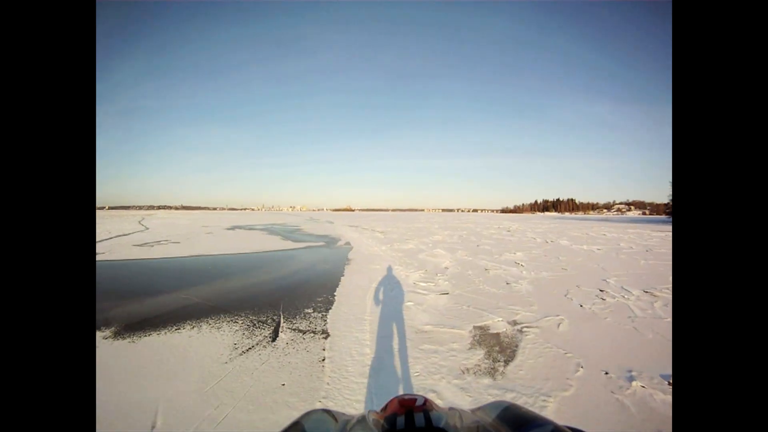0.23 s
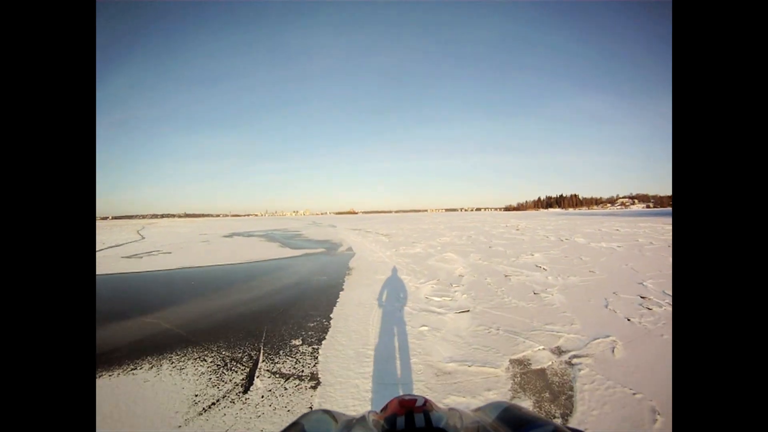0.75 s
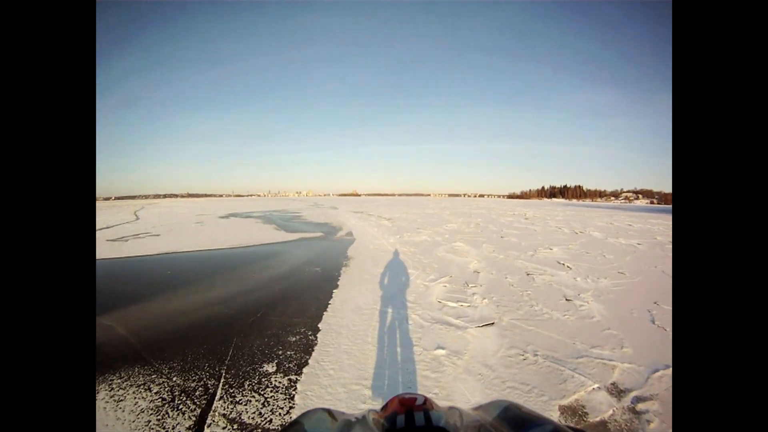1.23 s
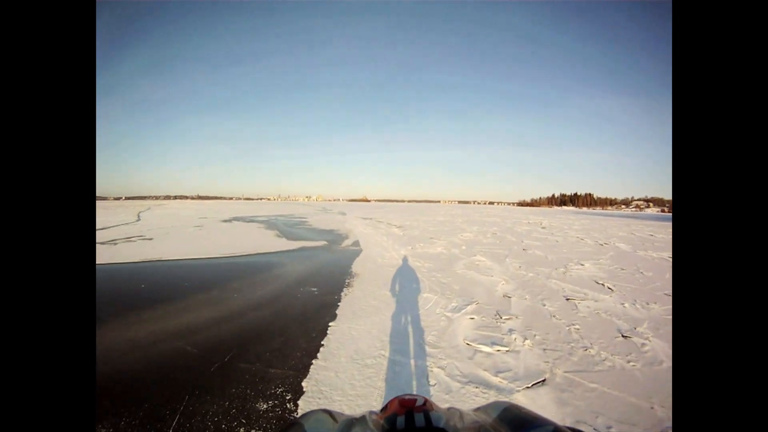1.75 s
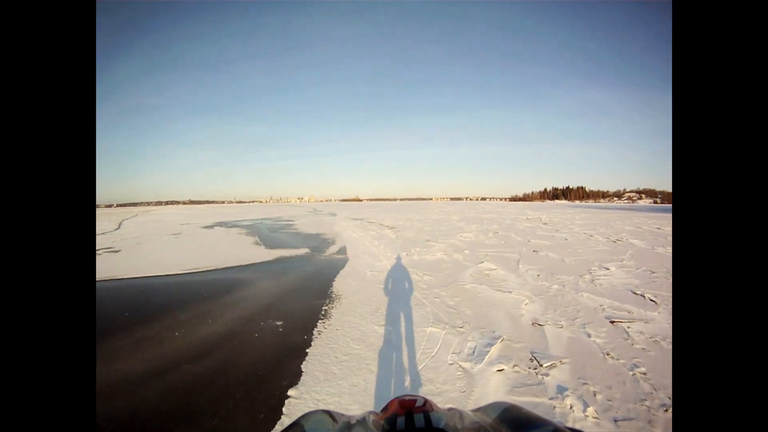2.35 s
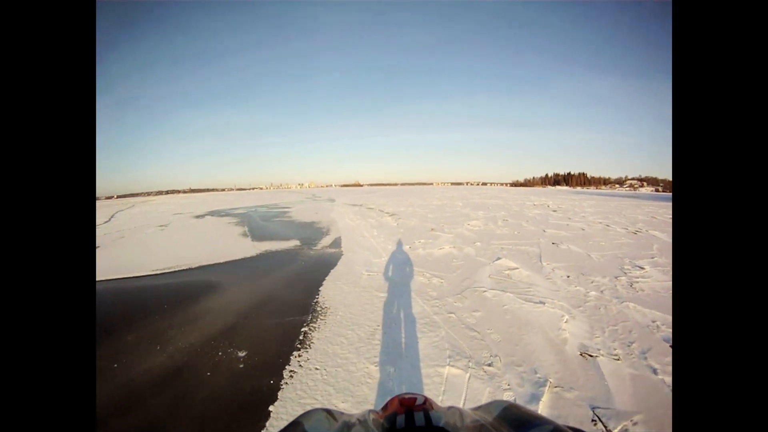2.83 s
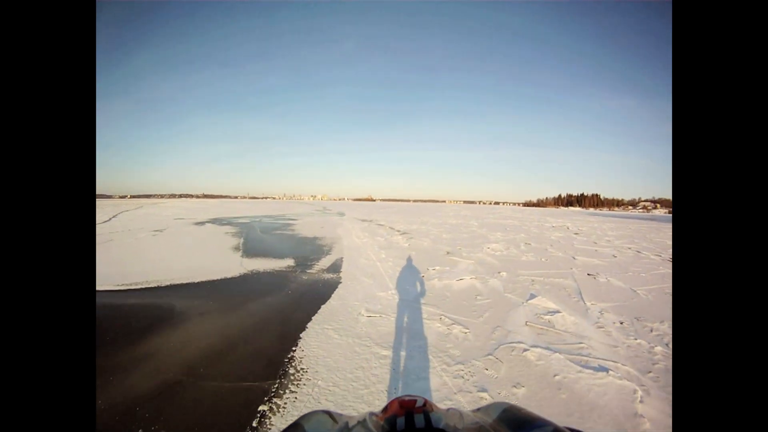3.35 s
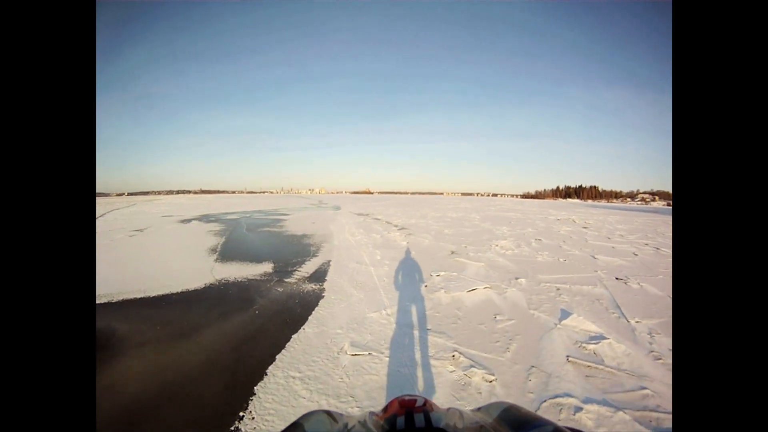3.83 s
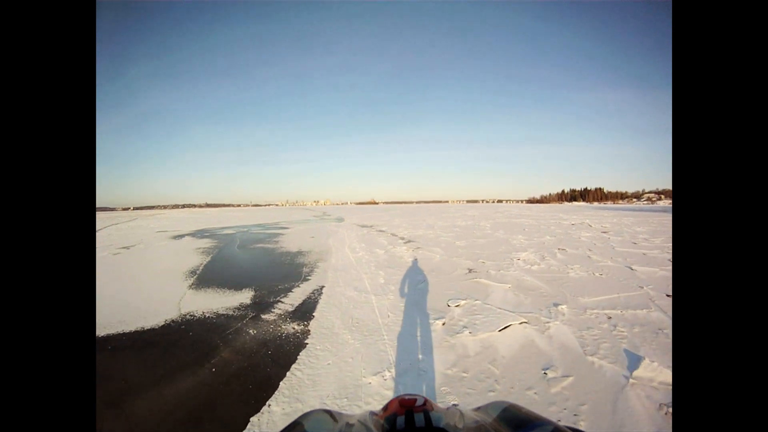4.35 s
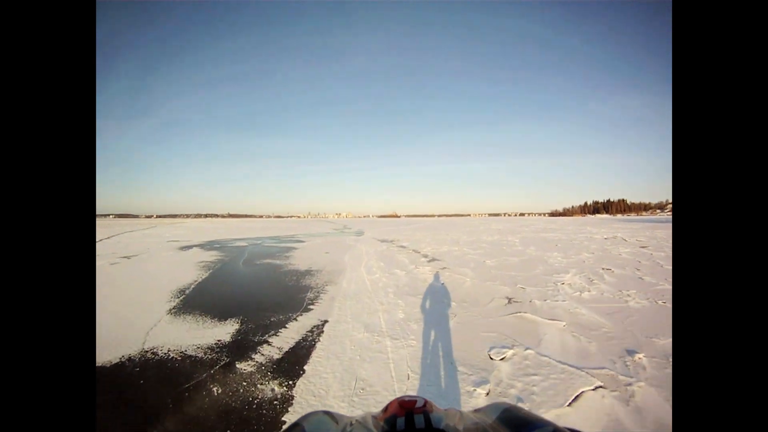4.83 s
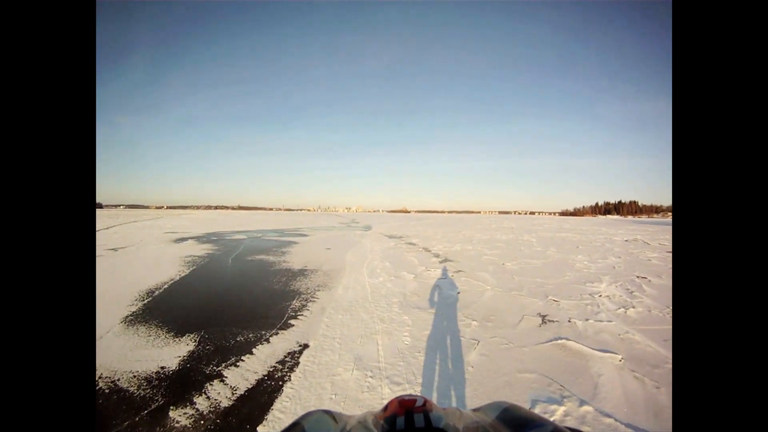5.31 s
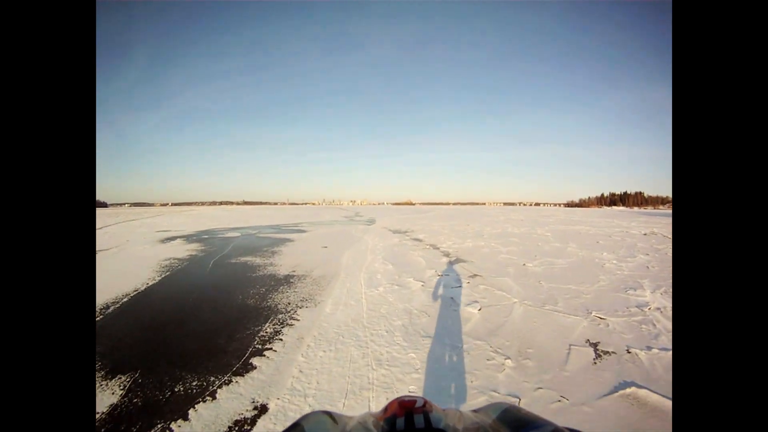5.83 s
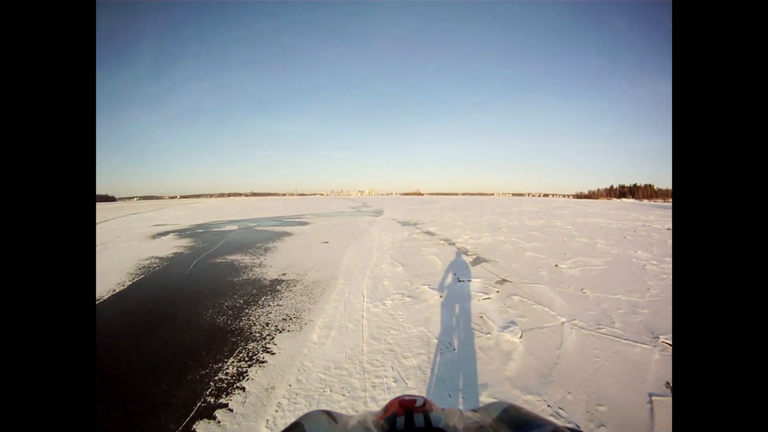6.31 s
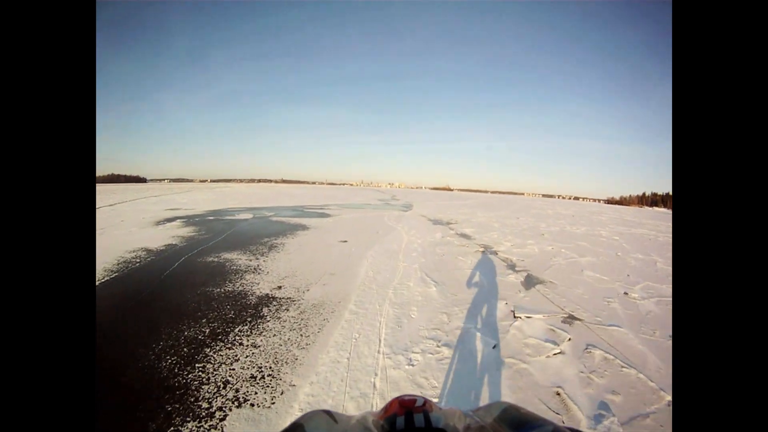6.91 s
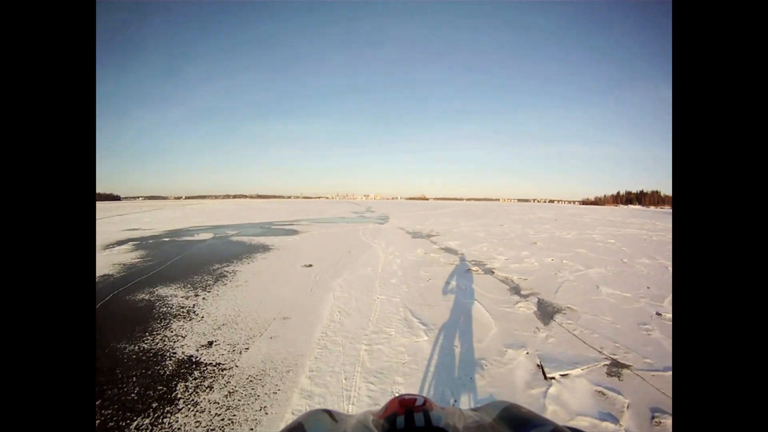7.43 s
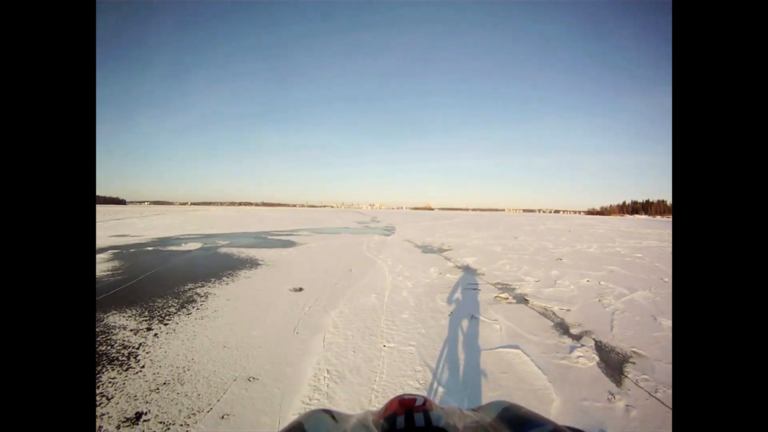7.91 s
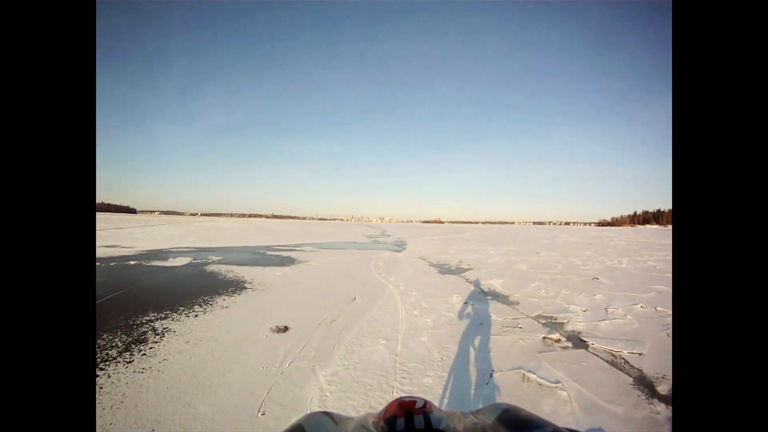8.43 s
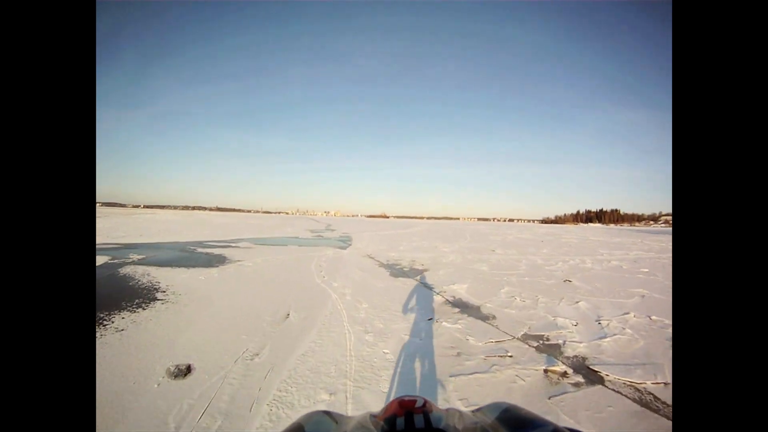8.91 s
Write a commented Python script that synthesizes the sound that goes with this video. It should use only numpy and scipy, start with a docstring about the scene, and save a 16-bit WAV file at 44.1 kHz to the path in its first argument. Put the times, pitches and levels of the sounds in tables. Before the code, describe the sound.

Studded bike tyre crunches steadily over crusted snow and ice while a loose part rattles on a hard case over low wind rumble.

```python
"""A low rumble, crunching snow and rattling run together from the start.
A studded bike tyre rolls over crusted snow and ice, heard inside a closed camera case worn on the body.
The rumble of wind and sway is slow shaped noise; the crunch and a bright hiss are random clicks passed
through resonances. A loose part chatters on the case as bursts of noise that make it ring, and knocks
add thumps and fading tones.
"""
import sys
import numpy as np
from scipy import signal
from scipy.fft import rfft, irfft
from scipy.io import wavfile
from scipy.ndimage import uniform_filter1d

SR = 44100
rng = np.random.default_rng(int(sys.argv[2]) if len(sys.argv) > 2 else 0)


def digitize_waveform(pressure):
    """Quantize a signal to 16-bit integers and store it at the path in sys.argv[1].

    Rows of a 2-D input are taken as channels; values are limited to [-1, 1].
    """
    field = np.atleast_2d(pressure).T
    bounded = np.clip(field, -1, 1)
    quanta = np.round(bounded * 32767).astype(np.int16)
    wavfile.write(sys.argv[1], SR, quanta)


N = 403956

# Table levels set the balance inside a layer; the functions add further trims in dB.


def amp(db):
    """Turns decibels into a plain multiplier."""
    return 10 ** (np.asarray(db) / 20)


def evened(x):
    """Scales x to an average strength (rms) of 1."""
    return x / np.sqrt(np.mean(x ** 2) + 1e-20)


def columns(rows):
    """Joins the points of each curve by straight lines, one value a sample."""
    times, *curves = np.transpose(rows)
    return [np.interp(np.arange(N) / SR, times, values) for values in curves]


def add(mix, start_s, sound):
    """Adds a short sound into mix at a given time, cut off at the end."""
    part = mix[round(start_s * SR):][:len(sound)]
    part += sound[:len(part)]


def ring(x, modes, steep, size=4096):
    """Makes x ring like a body with several resonances; a larger steep narrows each peak."""
    hz = abs(np.fft.fftfreq(size, 1 / SR))
    power = sum(amp(2 * db) / (1 + (2 * (hz - f) / width) ** 2) ** steep for f, width, db in modes)
    log_gain = np.log(power + 1e-10) / 2
    # this phase makes the ringing start with the blow, never before it
    phase = -signal.hilbert(log_gain).imag
    response = np.fft.ifft(np.exp(log_gain + 1j * phase)).real[:size // 2]
    return signal.oaconvolve(x, response / np.linalg.norm(response))[:N]


def coloured(points, x):
    """Gives x a smooth balance of low and high sound, at rms 1."""
    f, db = np.transpose(points)
    hz = np.fft.rfftfreq(N, 1 / SR)
    gain_db = np.interp(np.log(hz + 1), np.log(f + 1), db)
    return evened(irfft(rfft(x) * amp(gain_db), N))


def random_clicks(per_s):
    """Marks random moments, per_s of them a second on average."""
    return rng.random(N) < per_s / SR


def grit(per_s, spread_db):
    """Makes dense random clicks, a few of them large."""
    size = amp(spread_db * np.minimum(rng.exponential(1, N), 5)) * rng.standard_normal(N)
    return evened(size * random_clicks(per_s))


def flicker(hz, depth_db):
    """A gain that wanders at random, mostly slower than hz, by depth_db rms."""
    wander = signal.lfilter([1], [1, -np.exp(-2 * np.pi * hz / SR)], rng.standard_normal(N))
    return amp(depth_db * evened(wander))


# strength of the rumble: (time [s], level [dB])
RUMBLE_STRENGTH = [(0.0, -46.5), (.15, -30), (.8, -33.5), (1.8, -35.5), (2.8, -35), (3.12, -38.5),
                   (3.3, -34), (4.2, -34), (4.9, -35), (5.3, -34), (5.6, -36.5), (5.9, -32.5), (6.4, -38),
                   (6.9, -33.5), (8.0, -36), (8.2, -30.5), (9.16, -28.5)]
# tone balance of the slow swings: (frequency [Hz], level [dB per Hz])
RUMBLE_TONE = [(5, -24), (9, -2), (21, 2.5), (33, 0), (47, -10), (65, -18.5), (90, -26.5), (130, -55),
               (300, -90)]
# low thuds as bumps shake the camera: (time of the peak [s], level [dB])
LURCHES = [(.3, -25), (1.02, -26), (1.5, -25.5), (1.63, -31), (1.96, -29), (2.32, -28.5), (2.94, -25),
           (3.26, -26.5), (4.44, -28), (5.14, -29), (5.38, -27.5), (5.685, -23.5), (6.67, -23.5),
           (6.76, -26.5), (7.14, -25), (7.24, -22), (7.47, -29.5), (7.6, -31), (7.8, -28.5), (7.93, -24),
           (8.17, -22.5), (8.34, -24.5), (8.47, -20), (8.93, -27), (9.03, -23)]
# tone balance of the steady wind: (frequency [Hz], level [dB per Hz])
AIR_TONE = [(30, -26), (60, 1), (100, -5.5), (150, -6.5), (220, -10.5), (350, -15.5), (500, -15),
            (900, -40.5)]
AIR_DB = -53
LURCH_S = 0.022  # half width of a low thud


def rumble():
    """Sway and gusts make slow pressure swings, bumps add low thuds, and steady air rushes underneath."""
    swings = coloured(RUMBLE_TONE, rng.standard_normal(N))
    # make one swing much like the next
    nearby_size = uniform_filter1d(abs(signal.hilbert(swings)), size=1500)
    swings = evened(swings / (0.85 + nearby_size))
    # keep only the slow swings
    swings = signal.sosfilt(signal.butter(2, 75, fs=SR, output="sos"), swings)

    t = np.arange(N) / SR
    steady_level = amp(columns(RUMBLE_STRENGTH)[0]) * flicker(5.8, 1.45)
    lurch_power = sum(amp(2 * db) * np.exp(-((t - s) / LURCH_S) ** 2) for s, db in LURCHES)
    level = np.sqrt(steady_level ** 2 + lurch_power)
    air = coloured(AIR_TONE, rng.standard_normal(N) * flicker(10.8, 1.36))
    return level * swings + amp(AIR_DB) * air


# the ride: (time [s], crunch level [dB], brightness [dB], coarse lumps level [dB])
RIDE_CURVES = [(0.0, -58.5, 3.5, -62.5), (0.35, -57.5, 5, -62), (0.71, -52, -0.5, -54.5),
               (1.07, -48, 1.5, -55.5), (1.45, -52, -2, -57), (1.99, -48, -0.5, -63),
               (2.47, -52.5, 0.5, -62), (3.01, -46.5, 1, -61), (3.44, -47.5, -0.5, -62), (3.8, -44, 1, -62),
               (4.13, -47, -2.5, -63.5), (5.1, -48.5, 2, -62), (5.55, -45, 2, -54),
               (5.81, -49.5, -0.5, -61.5), (7.12, -52.5, -0.5, -61), (7.73, -48.5, 3, -55),
               (7.88, -52, 1, -59), (8.19, -53, 2, -57), (8.6, -51, 0, -65), (9.16, -50, -3, -68)]
# resonances of the crunch: (frequency [Hz], width [Hz], level [dB])
CRUNCH_TONES = [(396.4, 440, -21.5), (583, 70, -6), (757, 78, -9), (988, 129, 2), (1195.5, 78, 2),
                (1505, 390, -6.5), (1979, 482, -2.5), (2341, 110, -31), (3580, 440, -19.5),
                (4734, 370, -29.5)]
# tone balance of the bright hiss, also of the short tick: (frequency [Hz], width [Hz], level [dB])
HISS_TONES = [(7200, 397, -14.5), (8330, 710, -11.5), (9990, 790, -1), (10890, 370, -3.5),
              (12380, 100, -18), (13100, 400, -4.5), (13680, 374, -5.5)]
# dull tone of crust lumps breaking: (frequency [Hz], width [Hz], level [dB])
LUMP_TONES = [(330, 340, -2.5), (900, 540, -0.5), (1380, 490, -5)]
# the largest lumps of crust breaking: (time [s], peak level [dB])
LARGEST_LUMPS = [(0.693, -48), (0.898, -42), (1.025, -43), (1.282, -43), (1.517, -44), (2.133, -43),
                 (2.554, -43), (5.213, -37), (5.239, -44), (5.259, -38), (5.299, -43), (5.401, -47),
                 (5.439, -48), (5.714, -41), (5.912, -43), (7.037, -39.5), (7.409, -43), (7.645, -43),
                 (7.997, -45), (8.192, -35.5), (8.251, -48), (8.821, -41.5)]
LUMP_BLOW_DB = 26.5  # a lump starts as one short blow; its dull tone peaks this much lower
LUMP_DELAY_S, LUMP_BLOW_S = 0.00249, 0.00081  # delay from the listed time to the blow; its length
HISS_UNDER_CRUNCH_DB = -10.5


def tyre():
    """Crust breaks in grains and coarse lumps under the tyre; a bright hiss above 7 kHz follows the crunch."""
    crunch_db, bright_db, lumps_db = columns(RIDE_CURVES)
    grains = grit(4000, 1.5) * flicker(11, 1.54)
    body = ring(grains, CRUNCH_TONES, steep=1.394)
    upper = signal.sosfilt(signal.butter(2, 1650, "high", fs=SR, output="sos"), body)
    crunch = amp(crunch_db + 4.0) * (body + (amp(bright_db) - 1) * upper)

    breaks = amp(lumps_db + 2.0) * grit(150, 2.6)
    blow = np.hanning(round(LUMP_BLOW_S * SR))
    for s, db in LARGEST_LUMPS:
        add(breaks, s + LUMP_DELAY_S, -amp(db + LUMP_BLOW_DB) * blow / blow.sum())
    lumps = ring(breaks, LUMP_TONES, steep=1.82)

    hiss_clicks = grit(12000, 1.4) * flicker(16, 1.65)
    hiss = amp(crunch_db + HISS_UNDER_CRUNCH_DB) * ring(hiss_clicks, HISS_TONES, steep=2.1)
    return crunch + lumps + hiss


# clear taps of the loose part, rebounds included: (time [s], level [dB], time to fall 10 dB [ms])
TAPS = [(.014, -39, 1), (.0571, -41.5, 5), (0.123, -41.5, 8), (.169, -44, 4.5), (.206, -40, 4),
        (.229, -35.5, 7), (0.2885, -35.5, 4.5), (.3193, -47, 5), (.3507, -35, 4.5), (.3933, -36.5, 6.5),
        (.4016, -39, 9), (.4664, -42.5, 10), (0.48, -40, 3), (.4906, -38.5, 4), (.5385, -45, 26),
        (.65, -48.5, 33), (0.723, -37, 17), (.8945, -45, 5), (.9275, -35, 8.5), (.9498, -45, 5),
        (0.9918, -37, 1.5), (1.0013, -39.5, 9), (1.036, -39.5, 9), (1.0496, -46, 12), (1.1361, -38, 2.5),
        (1.1773, -36.5, 3), (1.1855, -40, 14), (1.381, -50, 15), (1.4638, -32.5, 2.5), (1.4727, -44, 18),
        (1.536, -41, 7), (1.6032, -38, 4), (1.609, -42, 14), (1.706, -38.5, 2.5), (1.7142, -46, 19),
        (1.776, -37, 5.5), (1.787, -44, 19), (1.94, -42, 2), (2.103, -46, 2), (2.1356, -48, 4),
        (2.146, -45, 3), (2.179, -40.5, 6), (2.283, -38, 4), (2.328, -35, 0.5), (2.3467, -40.5, 16),
        (2.3935, -39.5, 2), (2.401, -40.5, 8), (2.4558, -34, 3.5), (2.464, -40, 7), (2.5104, -46, 5),
        (2.638, -35, 1.5), (2.653, -41, 12), (2.8041, -38.5, 2.5), (2.845, -36.5, 6), (2.854, -37.5, 4),
        (2.896, -34.5, 5), (2.9537, -36.5, 16), (2.9762, -47, 7), (3.0087, -36, 7), (3.2154, -38, 17),
        (3.277, -34, 3), (3.3669, -44, 3), (3.3747, -36, 5.5), (3.489, -39, 2), (3.528, -39.5, 11),
        (3.5554, -47, 2.5), (3.6266, -34.5, 4), (3.6824, -38.5, 17), (3.757, -38, 5), (3.8348, -47, 18),
        (3.909, -38, 9), (3.9506, -36, 1), (3.966, -42, 4), (4.0224, -45, 4), (4.0588, -46, 5),
        (4.0802, -45.5, 13), (4.1074, -39.5, 6.5), (4.162, -39.5, 9), (4.3024, -36, 2), (4.3117, -45.5, 15),
        (4.4665, -45, 6), (4.51, -41, 4), (4.5172, -39.5, 7.5), (4.5846, -47, 1), (4.6635, -40, 5),
        (4.7356, -45, 2), (4.7689, -45, 3), (4.7931, -44, 19), (4.8384, -38.5, 8), (4.9178, -36.5, 12),
        (5.051, -47, 10), (5.064, -43, 2), (5.1019, -41, 2), (5.1366, -35.5, 7.5), (5.2146, -42, 11),
        (5.2301, -41, 7), (5.2426, -45, 12), (5.266, -39, 7), (5.284, -38.5, 20), (5.3325, -36.5, 13),
        (5.4124, -40.5, 9), (5.4825, -36.5, 7), (5.5005, -41, .6), (5.511, -48, 12), (5.5429, -41, 4),
        (5.6483, -30.5, 15), (5.6907, -34, 3), (5.6995, -40.5, 14.5), (5.7569, -44, 9), (5.773, -36.5, 5.5),
        (5.8213, -36, 10), (5.996, -45, 3), (6.0126, -45, 5), (6.025, -37.5, 19), (6.0483, -43, 13),
        (6.0642, -46, 11), (6.0817, -43, 3), (6.138, -35.5, 3.5), (6.1453, -40.5, 27), (6.174, -40, 2),
        (6.2313, -36, 5), (6.2398, -41, 22), (6.393, -44, 6), (6.566, -36.5, 2), (6.576, -39, 7),
        (6.5984, -34, 4), (6.6707, -35.5, 17), (6.7338, -33, 7), (6.7737, -33, 12), (6.8486, -42.5, 4),
        (6.9468, -38, 18), (7.0408, -38.5, 10), (7.0836, -42, 5), (7.1293, -37, 9), (7.1531, -34.5, 3.5),
        (7.229, -34.5, 4), (7.2363, -34, 5), (7.282, -46, 6.5), (7.3086, -39.5, 17), (7.3584, -37, 4.5),
        (7.4276, -37, 17.5), (7.476, -37, 4), (7.489, -43, 5), (7.5239, -35.5, 2.5), (7.5854, -39, 12),
        (7.6087, -36, 1.5), (7.616, -44, 24), (7.7217, -38, 7), (7.7712, -33.5, 3.5), (7.7772, -39, 13),
        (7.8442, -39, 5.5), (7.9058, -33.5, 14), (8.0011, -39.5, 6), (8.1122, -32, 1.5),
        (8.1188, -38.5, 13), (8.158, -33, 4.5), (8.1974, -40, 3.5), (8.206, -33.5, 10), (8.2484, -41, 8),
        (8.2668, -37.5, 13), (8.436, -34, 9), (8.4608, -47, 3), (8.4974, -39, 2.5), (8.5235, -36, 18),
        (8.5801, -42, 4), (8.5985, -43, 10), (8.6343, -41, 27.5), (8.692, -40, 2), (8.7562, -30, 3),
        (8.763, -41, 7), (8.789, -44, 4), (8.8334, -35, 17), (8.882, -33, 6), (8.926, -35.5, 12),
        (8.9934, -38.5, 6), (9.0075, -45, 7), (9.0295, -32.5, 2), (9.0584, -40, 10)]
# what the case rings with when tapped: (frequency [Hz], width [Hz], level [dB])
CASE_TONES = [(1040, 320, -10.5), (2017, 500, 3), (3596, 272, 1), (4337, 800, -5), (4912, 460, -3),
              (7070, 580, -6), (7600, 590, -10), (8370, 480, -8), (9920, 470, -10.5), (11000, 350, -24),
              (13330, 590, -24)]
# faint runs of bounces at random moments; the fall is the time to drop 10 dB
FAINT_PER_S, FAINT_DB, FAINT_SPREAD_DB, FAINT_FALL_MS = 8.1, -53.5, 2, 26


def chatter():
    """A loose part strikes the case, bounces unevenly and rattles on; each contact makes the case ring."""
    t_ms = np.arange(3000) / SR * 1000
    # these signals hold power, so their levels in dB are doubled inside amp
    strikes, runs = np.zeros(N), np.zeros(N)
    for s, db, fall_ms in TAPS:
        strike = amp(2 * (db + 5.0 - 8.2 * t_ms)) * np.minimum(t_ms / 0.22, 1)
        run = amp(2 * db - 2 * 10 * (t_ms / fall_ms) ** 1.76)
        after_rattle = amp(2 * (db - 14.0 - 0.73 * t_ms))
        add(strikes, s, strike)
        add(runs, s, run + after_rattle)

    faint_power = amp(2 * (FAINT_DB + FAINT_SPREAD_DB * rng.standard_normal(N)))
    faint = faint_power * random_clicks(FAINT_PER_S)
    runs = runs + signal.oaconvolve(faint, amp(-2 * 10 * t_ms / FAINT_FALL_MS))[:N]
    bounces = 0.36 + signal.oaconvolve(1. * random_clicks(450), amp(-2 * 5.4 * t_ms))[:N]

    # small taps at random moments all along
    small = amp(2 * (-60.5 + 2.5 * rng.exponential(1, N))) * random_clicks(120)
    small_taps = signal.oaconvolve(small, amp(-2 * 2.16 * t_ms))[:N]

    power = strikes + 1.095 * runs * bounces + small_taps
    contacts = np.sqrt(abs(power)) * rng.choice([-1., 1.], N)  # noise of random sign
    return amp(-0.47) * ring(contacts, CASE_TONES, steep=1.44)


# knocks: hard jolts, and the ringing of the largest breaking lumps:
# (time [s], ring level [dB], thump level [dB], hollow note level [dB])
KNOCK_LIST = [(0.899, -26.5, -50, -49), (0.947, -35, -51, -49), (1.029, -33, -43, -54),
              (1.282, -31, -46, -48), (1.518, -27.5, -51, -49), (2.134, -34, -57, -51),
              (2.555, -34, -56, -61), (2.928, -30, -42, -56), (3.234, -14, -25, -25.5),
              (4.465, -31, -53, -53), (5.213, -32, -52, -52), (5.241, -31, -54, -54),
              (5.259, -30, -53, -49), (5.34, -20.5, -26, -28.5), (5.653, -29, -27, -36),
              (5.715, -27, -49, -49), (5.796, -27, -53, -48), (5.912, -25, -60, -54.5),
              (6.069, -29, -56, -57), (6.631, -40, -45, -58.5), (7.41, -32, -45, -52),
              (7.646, -27.5, -45, -46.5), (7.916, -29, -27.5, -36), (8.193, -36, -41, -53),
              (8.252, -35, -48, -52), (8.282, -33, -32.5, -54), (8.459, -24.5, -32, -43)]
# what a knock rings with, hollow note first: (frequency [Hz], level [dB], time to fall 60 dB [s])
SHELL_TONES = [(599, 0, 0.032), (880, -2, 0.019), (1002, -3.5, 0.021), (1206, -7.5, 0.027),
               (1474, -7, 0.02), (2005, -8, 0.016), (2320, -11.5, 0.018)]
SWING_S = 0.0038  # first swing of the thump


def knocks():
    """A thump sinks in pitch, like a bending wave in a plate; the shell rings, with a short bright tick."""
    t = np.arange(4000) / SR
    swing = t / SWING_S
    shell, thumps, ticks = np.zeros(N), np.zeros(N), np.zeros(N)
    chance = rng.random((len(KNOCK_LIST), len(SHELL_TONES)))  # each knock excites the tones differently
    for (s, ring_db, thump_db, hollow_db), row in zip(KNOCK_LIST, chance):
        thump_fade = amp(-4.2 * swing) + 0.176 * amp(-220 * t)
        add(thumps, s, -amp(thump_db + 9.5) * np.sin(np.pi * swing ** 0.718) * thump_fade)

        tones = []
        for (hz, db, fall_s), luck in zip(SHELL_TONES, row):
            fade = amp(db + 7.1 * (luck - 0.5) - 60 * t / fall_s)
            tones.append(-fade * np.sin(2 * np.pi * hz * t))
        hollow = amp(hollow_db + 10.0) * tones[0]
        upper = amp(ring_db + 1.5) * sum(tones[1:])
        add(shell, s, (hollow + upper) * np.minimum(t / 0.0017, 1))
        add(ticks, s, amp(ring_db - 22.5 - 1500 * t))

    # clothing cushions the thump
    soft_thumps = signal.sosfilt(signal.butter(4, 215, fs=SR, output="sos"), thumps)
    return shell + soft_thumps + ring(ticks * rng.standard_normal(N), HISS_TONES, steep=0.94)


def scene():
    """Adds the four layers into one channel."""
    return (rumble() + tyre() + chatter() + knocks())[None]


def record(dry):
    """The microphone port weakens a band near 6 kHz; then the highest treble is cut off."""
    b, a = signal.iirnotch(6000, 7.5, SR)
    ported = 0.54 * dry + 0.44 * signal.lfilter(b, a, dry)
    treble_cut = signal.firwin(511, 13950, window=("kaiser", 9), fs=SR)  # cutoff in Hz
    return signal.oaconvolve(ported, treble_cut[None], "same")


dry = scene()
out = record(dry)
digitize_waveform(out)
```